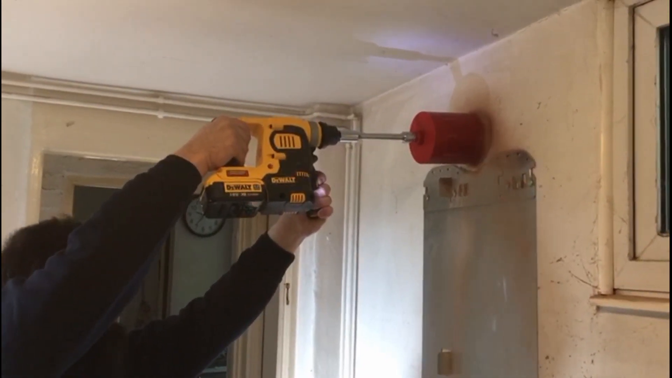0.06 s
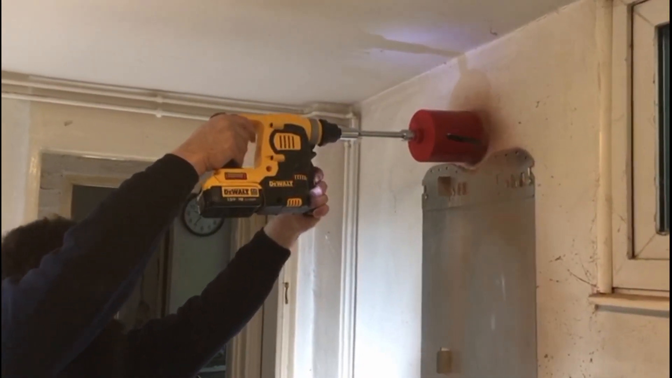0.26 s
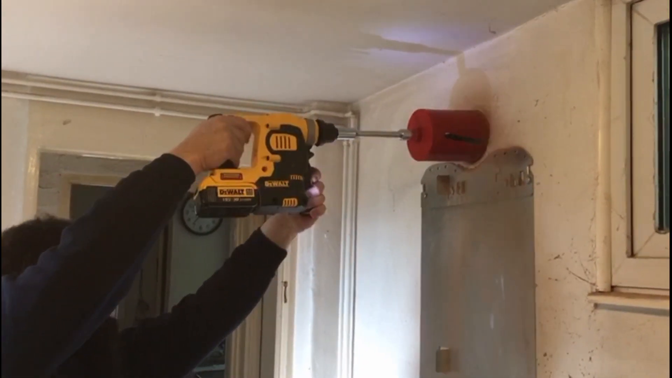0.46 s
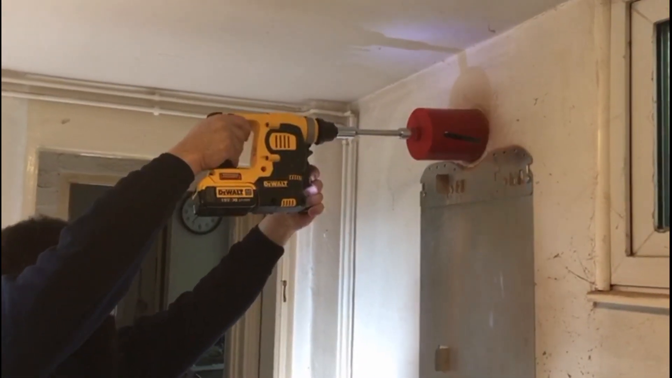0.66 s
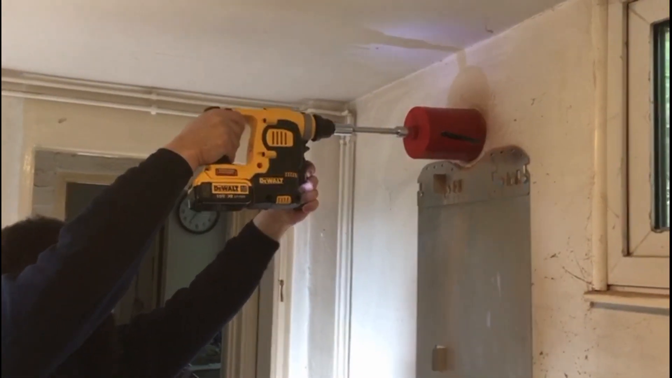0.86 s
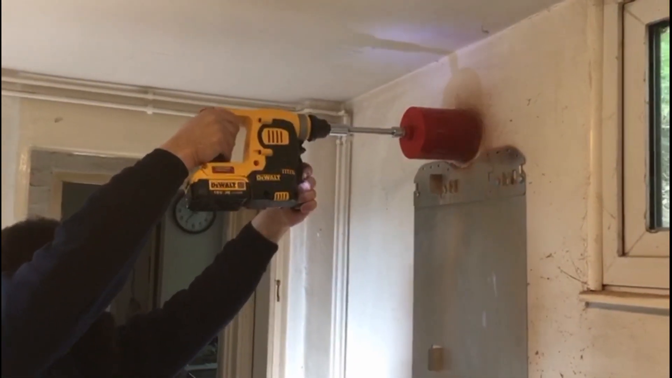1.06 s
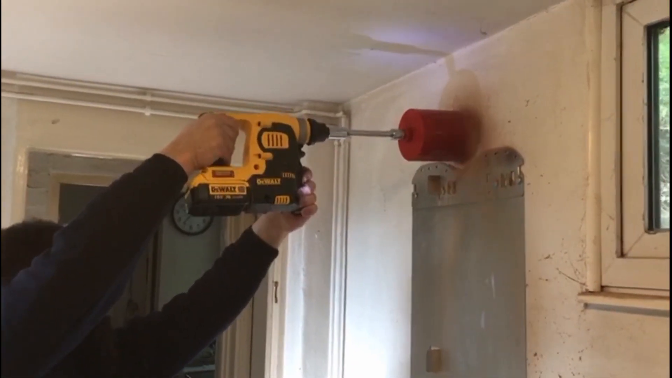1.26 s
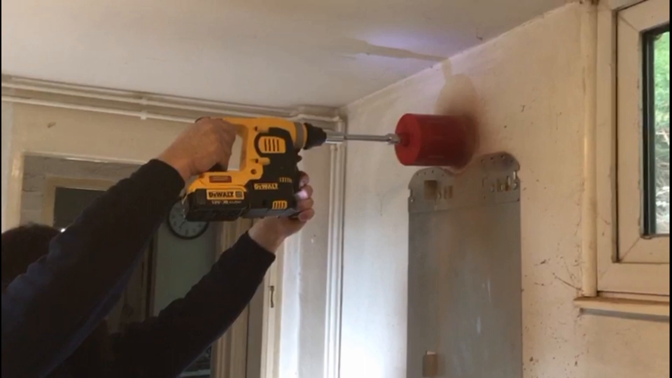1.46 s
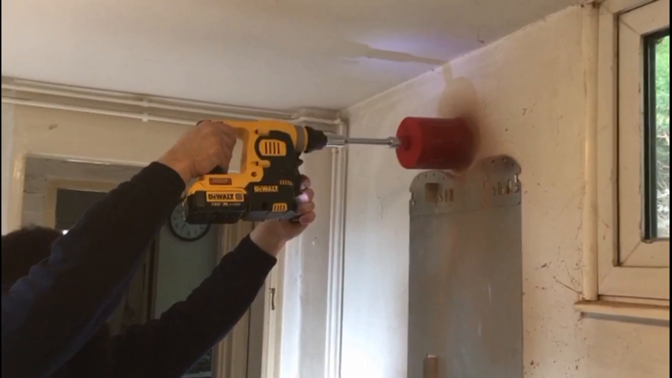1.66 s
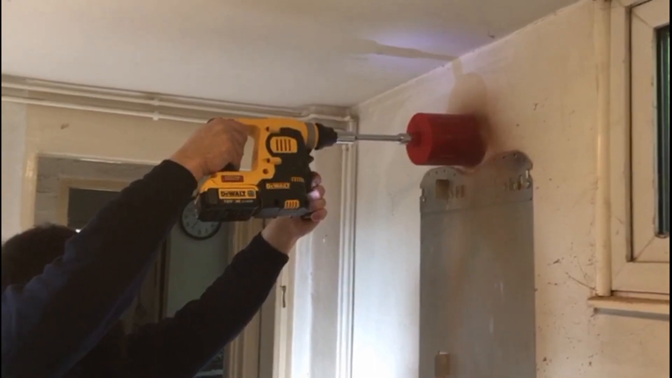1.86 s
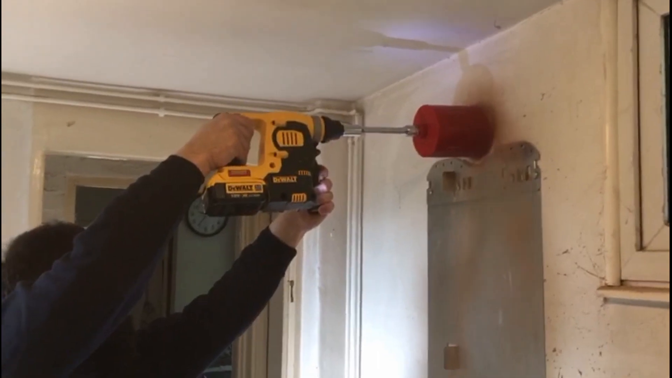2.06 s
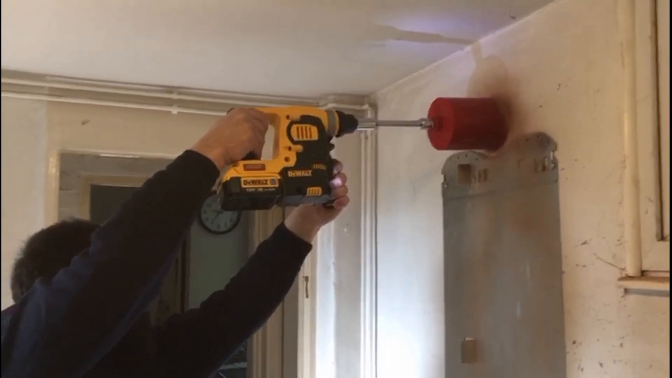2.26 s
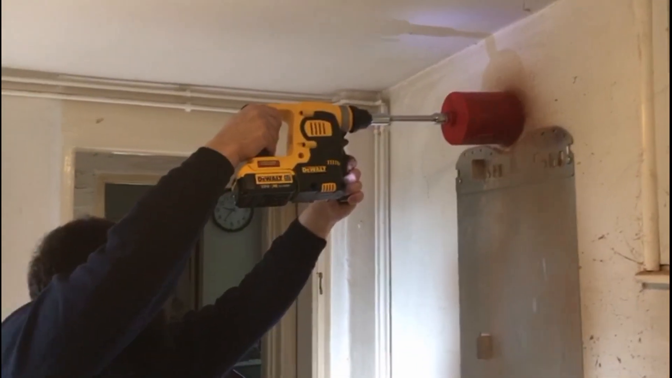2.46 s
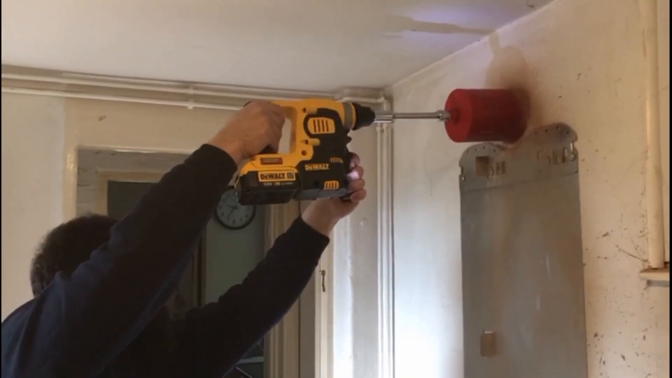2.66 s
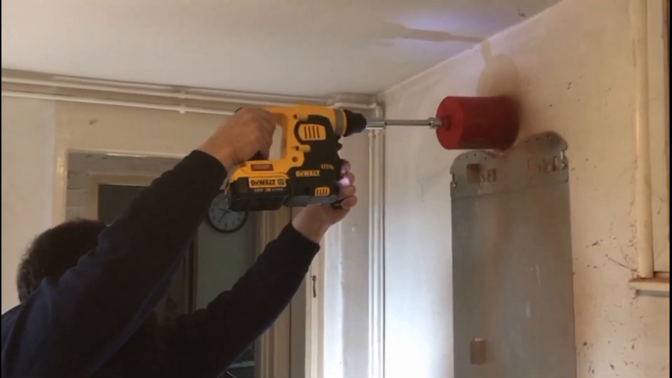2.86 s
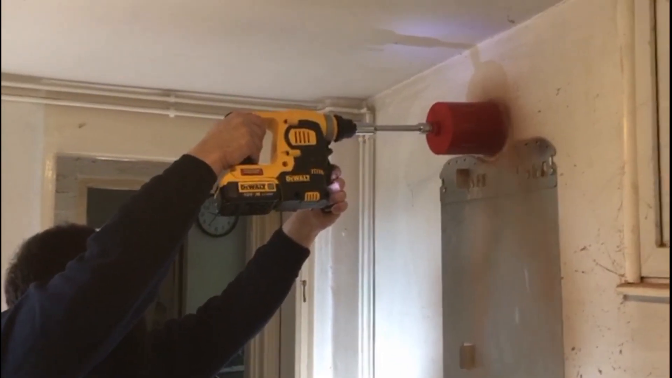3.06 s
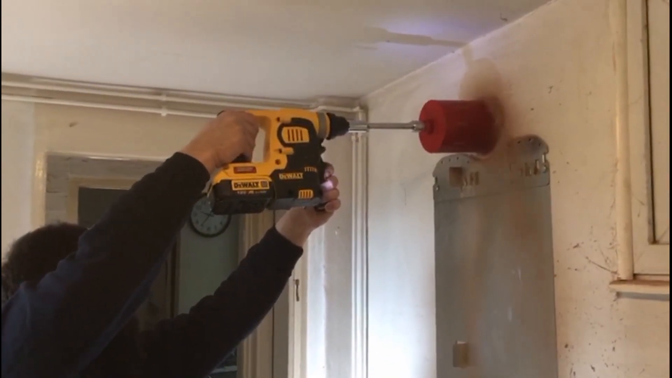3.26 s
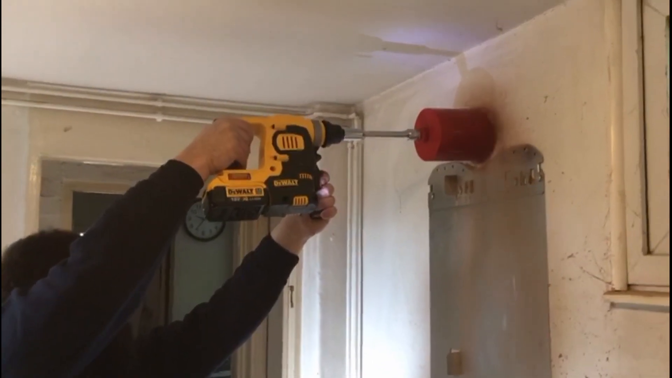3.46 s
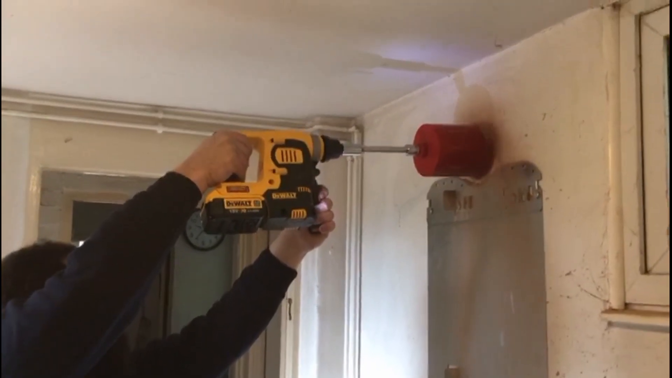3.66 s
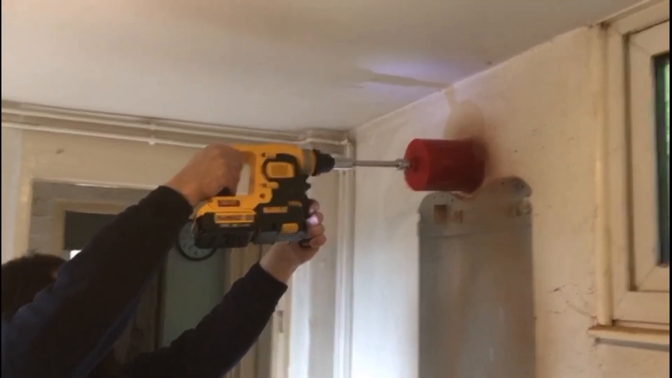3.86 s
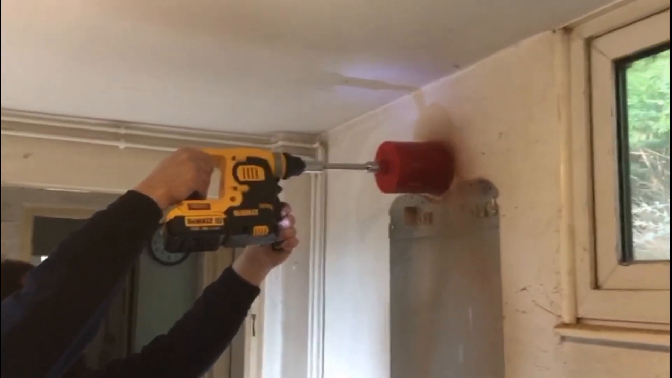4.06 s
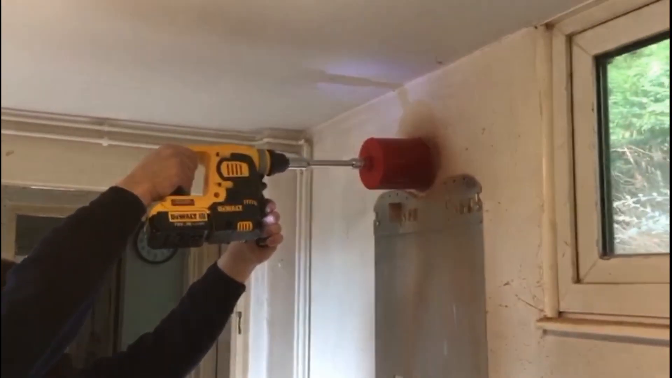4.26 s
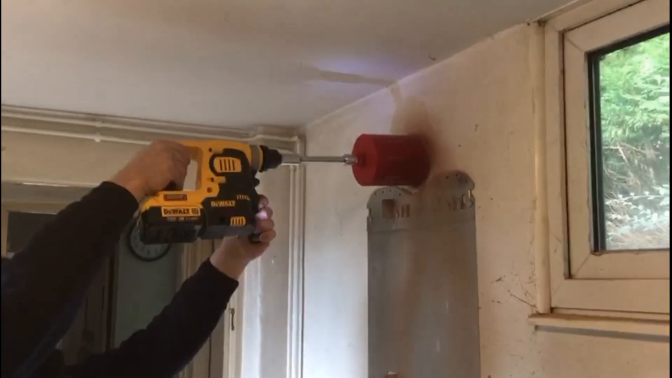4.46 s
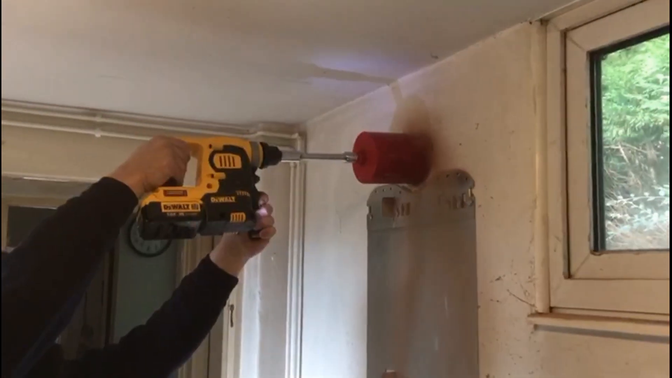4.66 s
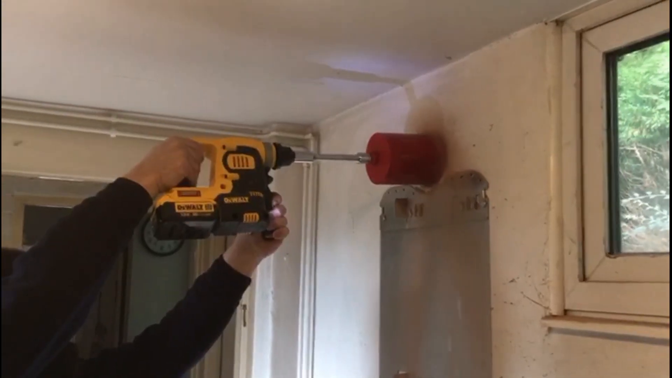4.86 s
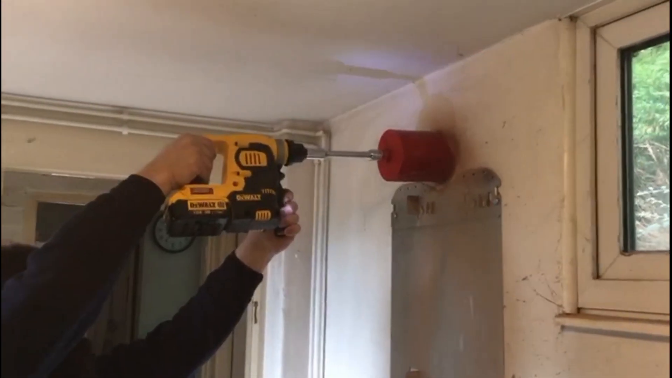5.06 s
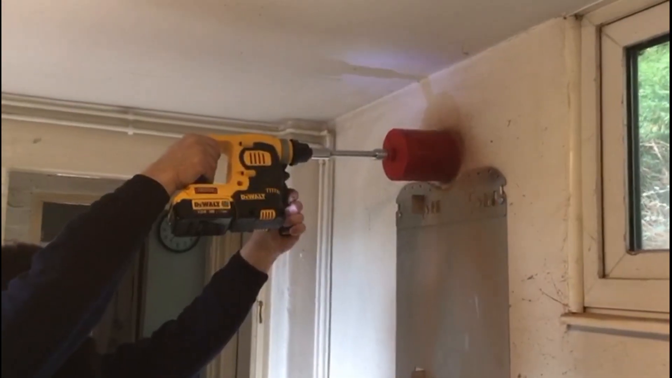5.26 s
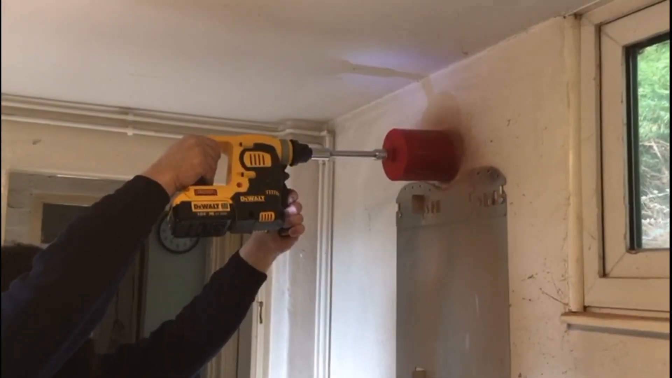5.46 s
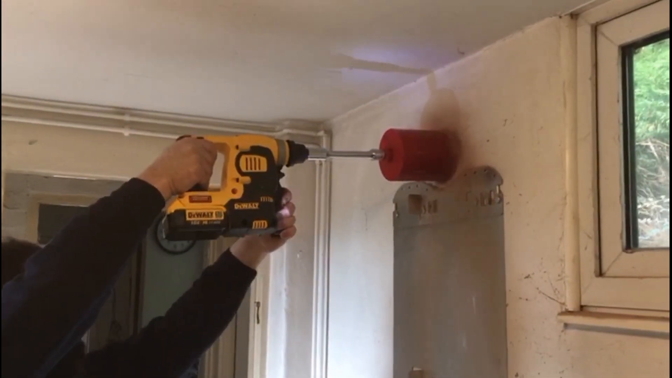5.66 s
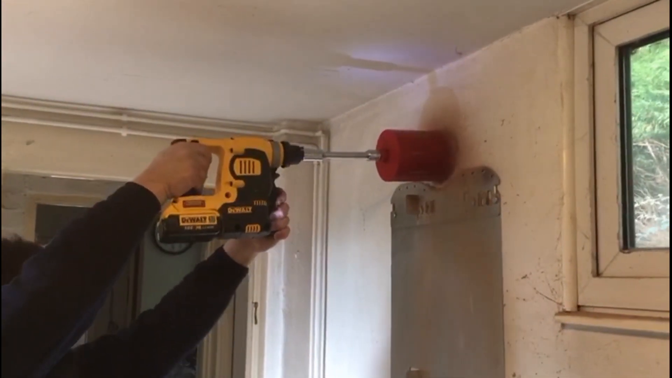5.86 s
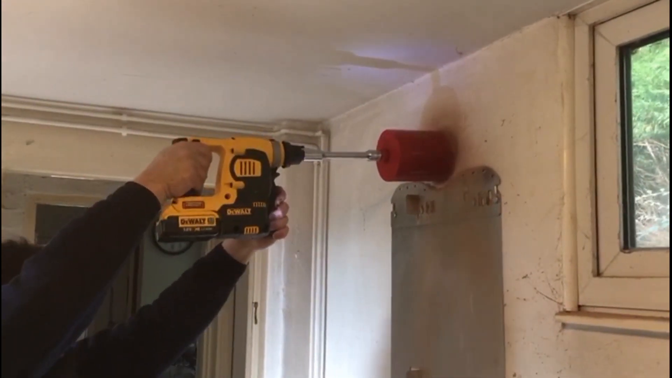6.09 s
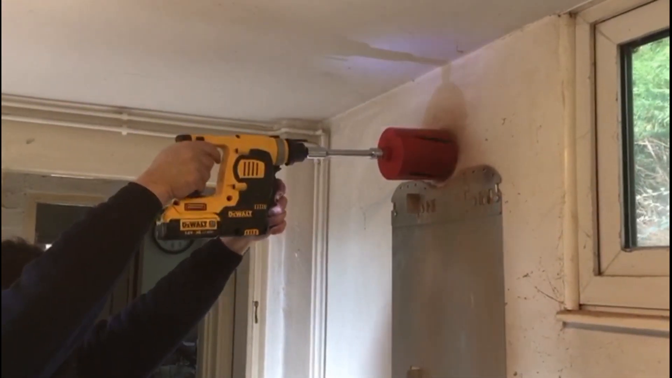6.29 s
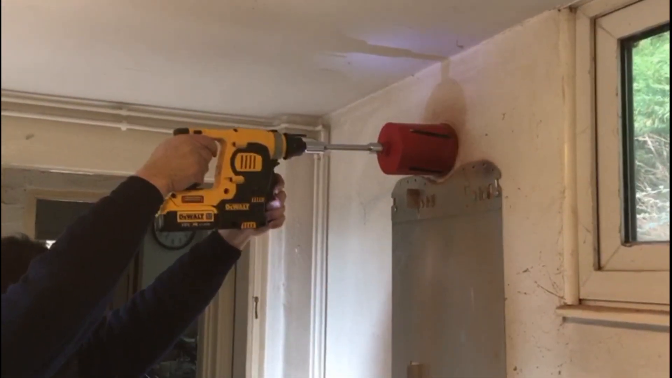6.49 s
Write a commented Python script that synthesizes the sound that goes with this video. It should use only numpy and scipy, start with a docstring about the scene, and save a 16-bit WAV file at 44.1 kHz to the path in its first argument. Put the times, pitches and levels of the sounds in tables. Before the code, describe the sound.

Loud gritty drilling into masonry with metallic barrel ring and rapid rattling beat, a short pause with faint scrapes, then long drilling resumes.

```python
"""A cordless drill turns a steel core bit against a masonry wall in a small bare room, pauses, and runs again.
Random clicks of grit hiss, ring the steel barrel, whine in the shank and knock the wall in a fast beat.
Teeth catch with hard scrapes; in the pause the barrel rings out and the idle bit scrapes lightly.
Sparse echoes make the room, soft noise the room tone; one close microphone hears it all."""
import sys
import numpy as np
from scipy import signal
from scipy.fft import rfft, irfft, next_fast_len
from scipy.io import wavfile
from scipy.ndimage import uniform_filter1d, minimum_filter1d

SR = 44100
rng = np.random.default_rng(int(sys.argv[2]) if len(sys.argv) > 2 else 0)


def unload_audio(sound):
    """Save the sound as a 16-bit wav file, at the path given as the first command line argument."""
    columns = np.transpose(np.atleast_2d(sound))
    # keep every value between -1 and 1, then stretch to whole-number steps
    steps = np.round(np.clip(columns, -1, 1) * 32767)
    wavfile.write(sys.argv[1], SR, steps.astype(np.int16))


N = 287973

# Level of the grit hiss and of the wall knock over it, with a sudden drop in level near 5.2 s:
# time_s, grit_hiss_db, wall_knock_over_hiss_db
LEVELS = [(0, -17, -5), (.35, -19.5, -8), (1.25, -18, -12.5), (1.6, -16, -12), (2.1, -18, -11.5),
          (2.6, -17, -14.5), (3.03, -17.5, -12.5), (3.1, -17.5, -10.5), (3.5, -19.5, -4),
          (3.95, -19.5, -13), (4.45, -19.5, -8), (5.0, -18.5, -4.5), (5.15, -21.5, -4), (5.21, -24.5, -6),
          (5.35, -21, -5.5), (6.15, -20.5, -3.5), (6.25, -22, -15.5)]


def drill():
    """Grit, steel, barrel, wall and shank follow shared levels; the beat throbs in the wall and hums on its own."""
    rise_db, fall_db = trigger()
    run_db = (rise_db + fall_db).max(0)
    linger = 1  # the barrel ring dies at this many times the speed of the hiss
    ringing_db = (rise_db + linger * fall_db).max(0)
    level_db, knock_db = columns(LEVELS)
    wall_rise, barrel_rise, whine_rise = bites()
    hiss_db = level_db + run_db
    wall_db = knock_db + wall_rise
    barrel_db = -5.5 + barrel_rise  # over the hiss; the first number holds between bites
    throb, hum = beat()
    hiss = gain_of(hiss_db + 1.0 * drift(0.018))

    grit = grit_hiss(hiss, wall_db, throb)
    steel = steel_modes(hiss, wall_db, barrel_db)
    barrel = barrel_ring(level_db + ringing_db + barrel_db)
    wall = wall_knock(hiss_db + wall_db, throb)
    whine = shank_whine(hiss_db, knock_db, whine_rise)
    caught = caught_teeth()
    running_hum = np.sqrt(2) * hum * gain_of(np.minimum(run_db, 0))
    return grit + steel + barrel + wall + whine + caught + running_hum


# The drill runs: trigger_pulled_s, teeth_stop_s
RUNS = [(-1.0, 0.36), (1.015, 6.352)]


def trigger():
    """Each run opens about 8 dB louder and settles within a quarter second; its stop is a steady fall in dB."""
    start_s, stop_db_per_s = 0.034, 349
    extra_db, settle_s = 8.5, 0.14  # louder opening; settle_s sets the width of its bell-shaped fade
    t = np.arange(N) / SR
    start, stop = np.transpose(RUNS)[:, :, None]
    rise = 20 * np.log10(np.clip((t - start) / start_s, 1e-5, 1))
    since = np.maximum(t - start - start_s, 0)
    opening = (extra_db * np.exp(-(since / settle_s) ** 2) * (t > start)).sum(0)
    return rise + opening, -stop_db_per_s * np.maximum(t - stop, 0)


# The wobbling bit bites into the masonry, or lets go of it (negative rise):
# peak_s, fade_length_s, wall_knock_rise_db, barrel_ring_rise_db, shank_whine_rise_db
BITES = [(0.004, 0.047, 2.5, 1, -5), (0.148, 0.084, 3, 4.5, 3), (0.231, 0.058, 9, 16, 5),
         (0.264, 0.025, -4, 6, -6), (1.14, 0.12, 10.5, 5, 5), (1.198, 0.054, 4, 10, 2),
         (1.355, 0.1, 6.5, 2.5, 9), (1.462, 0.1, 4.5, 0, 14), (1.78, 0.15, 8, 6, 2),
         (1.93, 0.071, 4, 7.5, 20.5), (2.298, .2, 6.5, 3, -1), (2.605, 0.15, 5, 4.5, 3),
         (2.88, 0.2, 2, 7.5, -1.5), (3.03, 0.023, -9, -6, -12), (3.088, .11, 2.5, 7.5, 14.5),
         (3.24, 0.056, 4.5, 6, 0), (3.367, 0.15, 2, 4, 8), (3.507, 0.14, 0.5, 8, 1),
         (3.814, 0.24, 4.5, 8, 6), (4.095, 0.13, 12.5, 7, 0), (4.304, 0.18, 4, 7, 15),
         (4.534, 0.12, 8, 10, 9), (4.71, .16, 4, 4.5, 14), (4.843, 0.065, 3.5, 7, 8),
         (5.024, 0.14, 7, 14.5, 2), (5.126, 0.071, 2.5, 14.5, 10), (5.342, 0.065, 1.5, 5, 14.5),
         (5.466, 0.073, 1, 7, -0.5), (5.564, 0.072, 1, 9, 5), (5.71, 0.13, 4.5, 7, 1),
         (5.85, 0.081, -2, 8.5, -4.5), (6.05, 0.22, 1, 12, 2.5), (6.14, 0.14, 2, 4.5, 5),
         (6.318, 0.15, 13, 10, 2)]


def bites():
    """Each bite swells a little faster than it fades, moving wall, barrel and shank by its own dB."""
    swell_share = 0.92  # length of the swell as a share of the fade
    t = np.arange(0, N / SR + .002, .002)
    peak, length, *dbs = np.transpose(BITES)[:, :, None]
    place = (t - peak) / np.where(t < peak, 2 * swell_share * length, 2 * length)
    shape = np.cos(np.pi * np.clip(place, -.5, .5)) ** 2
    rises = [(db * shape).sum(0) for db in dbs]
    return columns(np.transpose([t] + rises))


# The fast beat: time_s, beats_per_s, hum_db, octave_hum_db
BEAT = [(0, 62, -35, -40), (.4, 62, -36, -41), (1.0, 47, -44, -34), (1.17, 53, -42, -33),
        (1.3, 62, -40, -46), (1.7, 63, -36, -48), (2.3, 60, -41, -52), (3.4, 60, -38, -52),
        (3.8, 57, -43, -54), (4.5, 53, -41, -45), (5.05, 51, -40, -32), (5.3, 53, -42, -43),
        (5.8, 56, -41, -42), (6.25, 50, -54, -39)]


def beat():
    """A slightly unsteady beat: a throb that jumps and decays each turn, and a hum of two sines."""
    per_s, hum_db, octave_db = columns(BEAT)
    turns = np.cumsum(per_s * (1 + .012 * drift(.05))) / SR
    throb = evened(1.4 + np.exp(-(turns % 1) / 0.22))
    hum = gain_of(hum_db) * np.sin(2 * np.pi * turns)
    octave = gain_of(octave_db) * np.sin(4 * np.pi * turns)
    return throb, hum + octave


# Colour of the grit: pitch_hz, relative_level_db
GRIT = [(50, -19.5), (90, -10), (150, -12.5), (440, -17.5), (700, -20), (1700, -21), (2300, -15.5),
        (3000, -15), (6000, -13), (9700, -14.5), (10600, -21.5), (12000, -30.5)]


def grit_hiss(hiss, wall_db, throb):
    """Dense coloured clicks throb gently with the beat."""
    clicks = evened(coloured(grains(9000, 2.5), GRIT))
    grit = clicks * hiss * gain_of(2.5) * (0.6 + 0.073 * throb)
    dull = signal.sosfilt(signal.butter(2, 1800, fs=SR, output="sos"), grit)
    # the dull part of the grit swells with the knock
    return grit + dull * (gain_of(0.55 * wall_db + 3.5) - 1)


# Finer modes of barrel and shank: pitch_hz, filter_width_hz, relative_level_db
STEEL = [(2458, 12, -6), (2580, 70, -9), (2633, 26, -1), (2700, 60, -9), (2759, 14, 1), (2950, 50, -3),
         (3000, 60, -2), (3165, 70, -5), (3420, 50, -4), (3480, 18, -1), (3783, 50, -6), (3950, 40, -7),
         (4250, 90, -9), (4520, 150, -9), (5310, 90, -9), (6140, 90, -8), (6320, 150, -8), (6750, 130, -9),
         (11050, 500, -15)]


def steel_modes(hiss, wall_db, barrel_db):
    """Grit rings the finer steel modes; a harder bite wakes them more."""
    bite_db = 0.097 * wall_db + 0.56 * barrel_db
    return gain_of(14.5) * struck(STEEL, hiss * gain_of(bite_db), 5000, 2.5, 3.46, 0.55)


# Main ring of the barrel: pitch_hz, filter_width_hz, relative_level_db
BARREL = [(1965, 30, -5), (1999, 40, 0), (2032, 44, -4), (2085, 70, -9), (2165, 80, -10), (2222, 50, -16)]


def barrel_ring(level_db):
    """Unsteady chatter of grit keeps the main barrel modes ringing."""
    chatter = gain_of(level_db + 2.5 * drift(.01))
    return gain_of(23) * struck(BARREL, chatter, 3000, 3.4, 1.8, 0.76)


# Wall and drill body: pitch_hz, filter_width_hz, relative_level_db
WALL = [(237, 58, 0), (318.6, 34.6, 2), (378, 132, -8.5), (568, 95, 1), (662, 136, 1), (794, 220, -0.5),
        (1128, 465, -3.5), (1280, 610, -17.5)]


def wall_knock(level_db, throb):
    """Grit shakes the low modes of wall and drill body in time with the beat."""
    return gain_of(12) * struck(WALL, gain_of(level_db) * throb, 1500, 2.36, 3.3, 0.91)


def shank_whine(hiss_db, knock_db, whine_rise):
    """Grit excites one narrow mode of the shank; the whine follows the knock by a share."""
    shank_hz, filter_width_hz = 1508, 12
    whine_db = hiss_db - 23 + 0.61 * (knock_db + 8.5) + whine_rise
    return ring(gain_of(whine_db) * grains(3000, 4.3), shank_hz, filter_width_hz, 37.1)


# Teeth catching hard: time_s, relative_blow_db
SNAGS = [(1.011, -19.5), (1.443, -9.5), (2.2796, -9), (2.573, -16), (3.0834, -12), (3.246, -10.5),
         (3.3525, -4), (3.3854, -23), (3.49, -9), (3.505, -10), (4.024, -11.5), (4.299, -7.5),
         (5.0212, -11), (5.094, -10), (5.3286, -10), (5.937, -12.5), (5.9695, -11), (6.0066, -20),
         (6.287, -18), (6.3219, -30)]


def snags():
    """Short bursts of noise where a tooth catches, each peaking after about 6 ms."""
    blows = np.zeros(N)
    s, db = np.transpose(SNAGS)
    blows[np.round(s * SR).astype(int)] = gain_of(db)
    t = np.arange(SR // 20) / SR
    burst = t / 0.0056 * np.exp(1 - t / 0.0058)
    scrape = signal.oaconvolve(blows, burst)[:N]
    return scrape * rng.standard_normal(N)


def caught_teeth():
    """A catching tooth rings the barrel, the wall and the finer steel modes."""
    catch = snags()
    barrel = sum(ring(catch, *mode) for mode in BARREL)
    others = sum(ring(catch, *mode) for mode in [*WALL, *STEEL])
    return gain_of(27.5) * barrel + gain_of(6.5) * others


# Modes of the barrel ringing free of the masonry: pitch_hz, time_to_fall_60_db_s
FREE = [(1518, .5), (1975, 1.2), (2460, .35), (2730, .7), (3483, .35)]
# The teeth come to rest: time_s, bit_touches_masonry_again_s, then one level_db for each free mode
LIFTS = [(.4, .58, -46, -40, -48, -48, -44), (6.41, 6.6, -50, -58, -55, -42, -37)]


def lifts():
    """When the teeth stop, the barrel rings out in thin fading sines, until touching the wall damps it."""
    touch_db_per_s = 300  # extra damping once it touches
    out = np.zeros(N)
    for s, touch, *dbs in LIFTS:
        t = np.maximum(np.arange(N) / SR - s, 0)
        onset = np.clip(t / 0.013, 0, 1)
        damping_db = touch_db_per_s * np.maximum(t + s - touch, 0)
        for (hz, t60), db in zip(FREE, dbs):
            level = gain_of(db - 60 * t / t60 - damping_db)
            out += level * onset * np.sin(2 * np.pi * hz * t)
    return out


# The idle bit is shifted in the cut: start_s, length_s, scrape_db, ring_drive_over_scrape_db
NUDGES = [(0.581, 0.042, -39.5, -1.5), (0.657, 0.018, -46, -2), (0.858, 0.073, -41.5, 2),
          (0.951, 0.023, -40, 2)]
# Modes that a light scrape wakes: pitch_hz, filter_width_hz, relative_level_db
IDLE = [(1518, 20, -13), (2040, 45, 0), (3030, 60, -8), (3400, 180, -9), (4310, 90, -4), (4770, 60, -9),
        (6150, 300, -9), (6670, 45, -5)]


def nudges():
    """Light grit scrapes that start quickly, hold, and fade as the bit settles, ringing the steel."""
    t, level, rung = np.arange(N) / SR, np.zeros(N), np.zeros(N)
    for s, length, db, ring_db in NUDGES:
        onset = np.clip((t - s) / 0.023, 0, 1)
        fade_db = 193 * np.clip(t - s - length, 0, 1)
        stroke = onset * gain_of(db - fade_db)
        level += stroke
        rung += gain_of(ring_db) * stroke
    scrape = level * evened(coloured(grains(6000, 2.3), GRIT))
    return scrape + gain_of(19) * struck(IDLE, rung, 4000, 3, 3, .5)


def struck(modes, level, per_s, spread_db, wander_db, shared):
    """Each mode is fed by common grit and by grit at its own spot on the rim, which comes and goes."""
    common, out = grains(per_s, spread_db), np.zeros(N)
    for mode in modes:
        own = grains(per_s, spread_db) * gain_of(wander_db * drift(0.083))
        out += ring(level * (shared * common + own), *mode)
    return out


def ring(x, hz, width, db):
    """One mode with steep flanks: a two-pole resonance applied twice, peak gain db."""
    r = np.exp(-np.pi * width / SR)
    w = 2 * np.pi * hz / SR
    stage = [(1 - r * r) / 2, 0, -(1 - r * r) / 2, 1, -2 * r * np.cos(w), r * r]
    return gain_of(db) * signal.sosfilt([stage, stage], x)


def grains(per_s, spread_db):
    """Random clicks of either sign, scaled to rms 1; a few are large."""
    draw = rng.random((3, N))
    size = gain_of(spread_db * np.minimum(-np.log(draw[0] + 1e-9), 5))
    sign = np.sign(draw[1] - .5)
    present = draw[2] < per_s / SR
    return evened(size * sign * present)


def drift(seconds):
    """Slow random wander of rms 1: noise averaged twice over the given time."""
    size = max(round(seconds * SR), 2)
    smooth = uniform_filter1d(rng.standard_normal(N), size)
    return evened(uniform_filter1d(smooth, size))


def coloured(x, points):
    """Shapes x by a gain curve in dB over pitch."""
    size = next_fast_len(N + SR // 4)
    hz = np.fft.rfftfreq(size, 1 / SR)
    return irfft(rfft(x, size) * gain_of(read(points, hz)), size)[:N]


def read(points, hz):
    """Reads a curve over pitch on a log-frequency axis."""
    f, value = np.transpose(points)
    return np.interp(np.log(hz + 1), np.log(f + 1), value)


def columns(table):
    """Every column after the time column, joined by straight lines, one value a sample."""
    s, *rest = np.transpose(table)
    return [np.interp(np.arange(N) / SR, s, c) for c in rest]


def gain_of(db):
    """Decibels to a factor."""
    return 10 ** (np.asarray(db) / 20)


def evened(x):
    """Scales to rms 1."""
    return x / np.sqrt(np.mean(x ** 2) + 1e-20)


# How long the room echoes last: pitch_hz, time_to_fall_60_db_s
ROOM_T60 = [(100, 0.4), (1000, 0.56), (8000, 0.42)]


def room(x):
    """Sparse echoes of random sign, each frequency band dying at its own speed."""
    at = np.arange(200, SR // 2, 20)
    taps = np.zeros(SR // 2 + 20)
    taps[at + rng.integers(0, 20, len(at))] = rng.choice([-1., 1.], len(at))
    hz, t, bands = signal.stft(taps, SR, nperseg=256)
    fade = gain_of(-60 * t / read(ROOM_T60, hz)[:, None])
    tail = signal.istft(bands * fade, SR, nperseg=256)[1]
    return signal.fftconvolve(x, tail / np.linalg.norm(tail))[:N]


# Colour of the room tone: pitch_hz, relative_level_db
QUIET = [(40, -6), (65, 0), (130, -3), (275, -24), (1000, -34), (6000, -36), (12000, -42)]


def room_tone():
    """Steady soft noise, strongest in the bass."""
    return gain_of(-51) * evened(coloured(rng.standard_normal(N), QUIET))


def scene():
    """The drill, its room and the room tone, alike in both channels."""
    tool = drill() + nudges() + lifts()
    tone = room_tone()
    return np.tile(tool + gain_of(-13.5) * room(tool) + tone, (2, 1))


def record(dry):
    """Low cut, a narrow hollow in the microphone response, a quick limiter on the peaks, then a treble cut."""
    low_cut_hz, treble_cut_hz = 50, 12080
    hollow_hz, half_width_hz, hollow_db = 4920, 165, -15
    f = np.linspace(0, SR / 2, 513)
    response_db = hollow_db * np.exp(-((f - hollow_hz) / half_width_hz) ** 2)
    hollow = signal.firwin2(1023, f, gain_of(response_db), fs=SR)
    low_cut = signal.butter(6, low_cut_hz, "high", fs=SR, output="sos")
    heard = signal.oaconvolve(signal.sosfilt(low_cut, dry), hollow[None], "same")
    # lowest gain needed within 10 ms (441 samples), then smoothed
    peak_gain = minimum_filter1d(.99 / np.maximum(abs(heard), .99), size=441)
    held = heard * uniform_filter1d(peak_gain, size=441)
    treble_cut = signal.firwin(767, treble_cut_hz, window=("kaiser", 9), fs=SR)
    return signal.oaconvolve(held, treble_cut[None], "same")


dry = scene()
out = record(dry)
unload_audio(out)
```